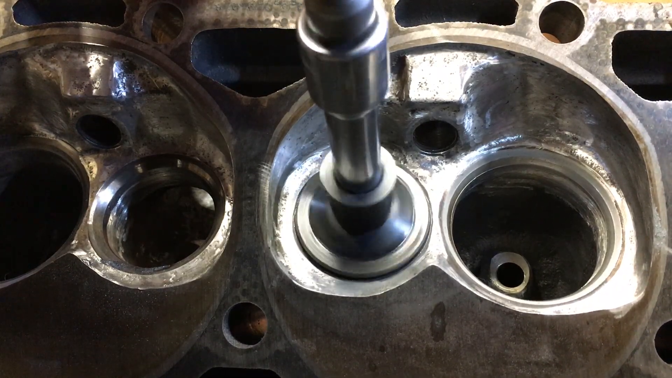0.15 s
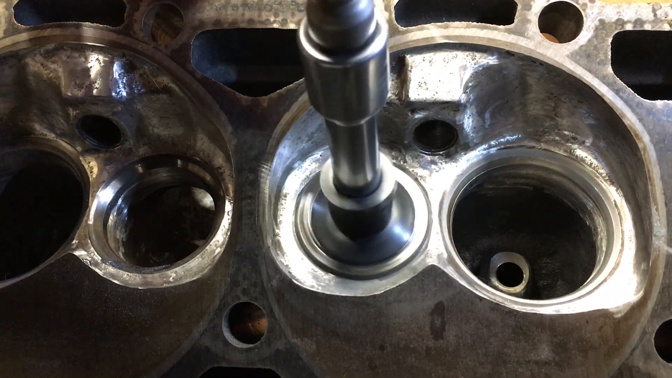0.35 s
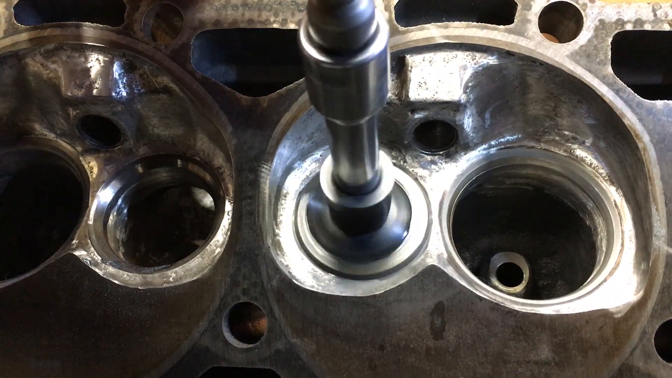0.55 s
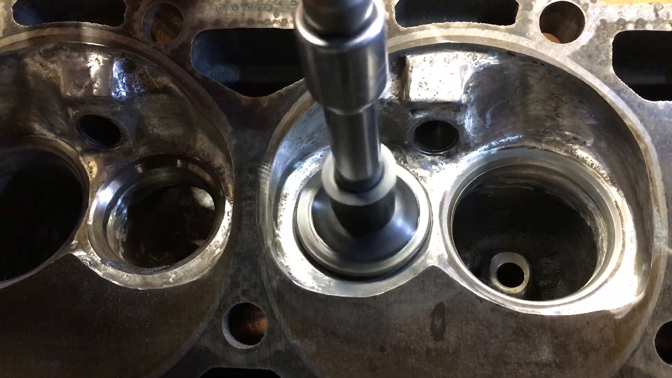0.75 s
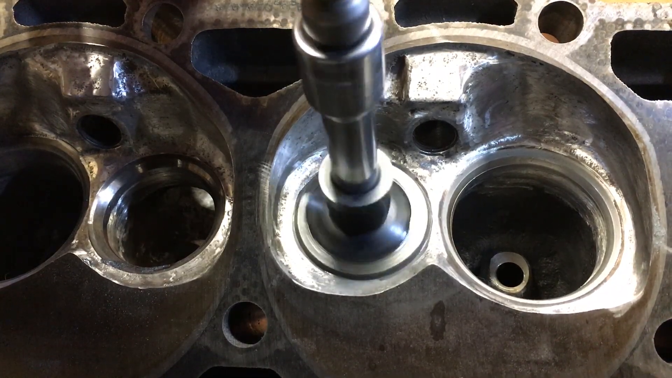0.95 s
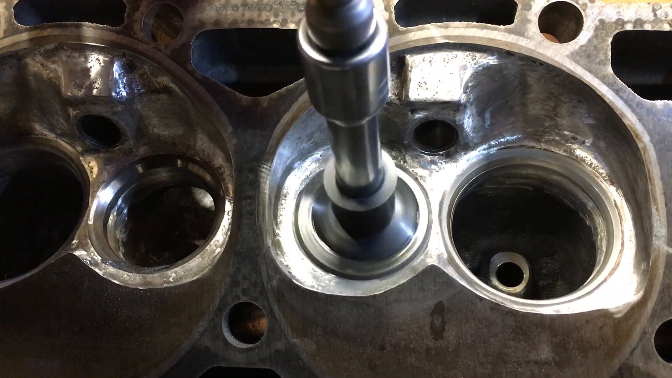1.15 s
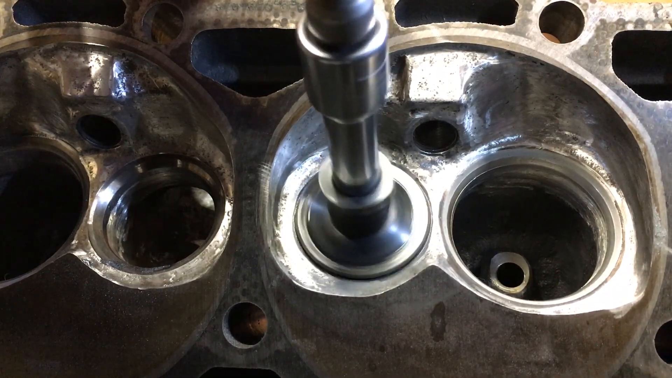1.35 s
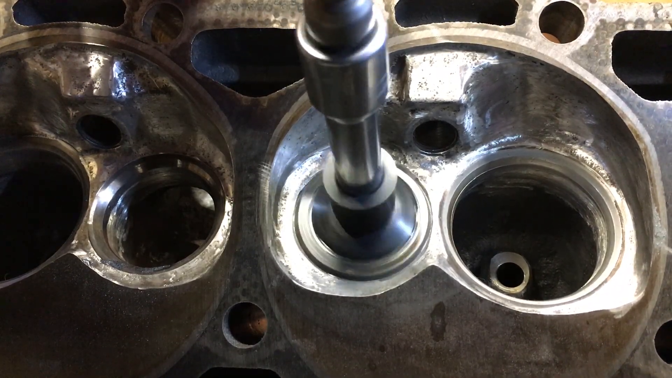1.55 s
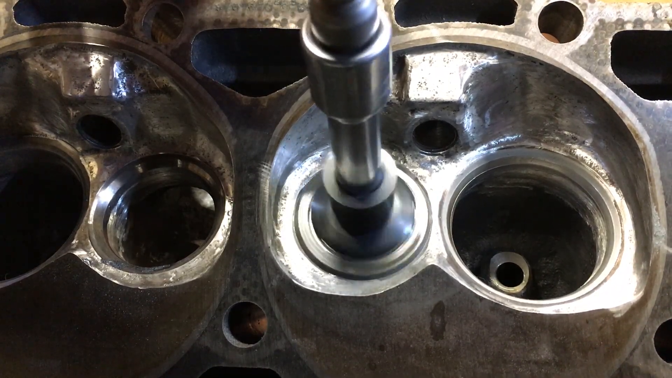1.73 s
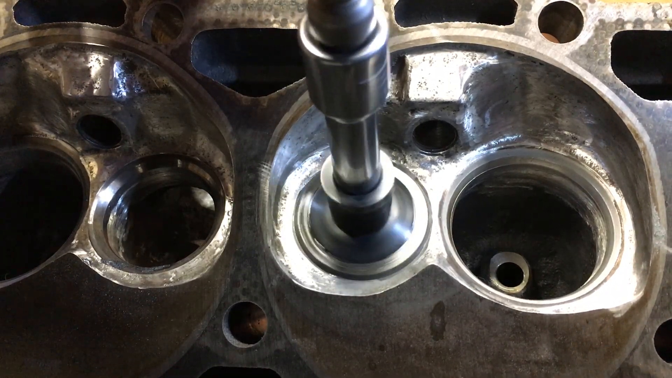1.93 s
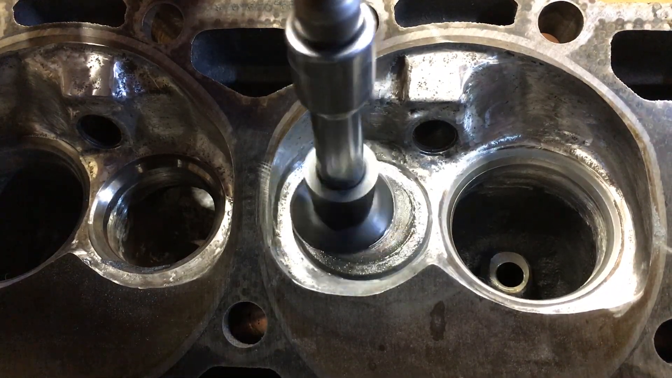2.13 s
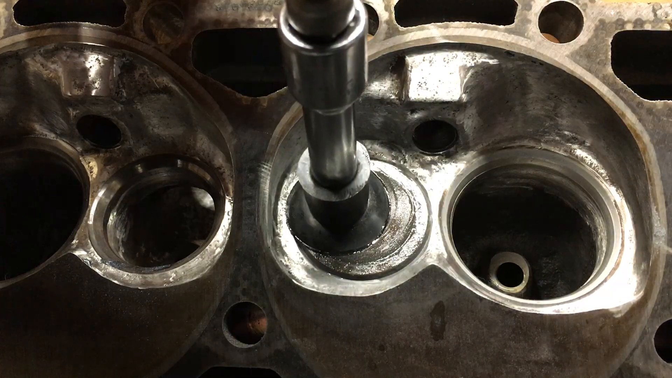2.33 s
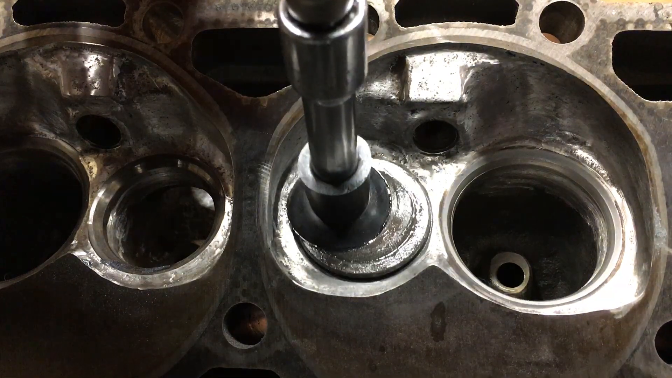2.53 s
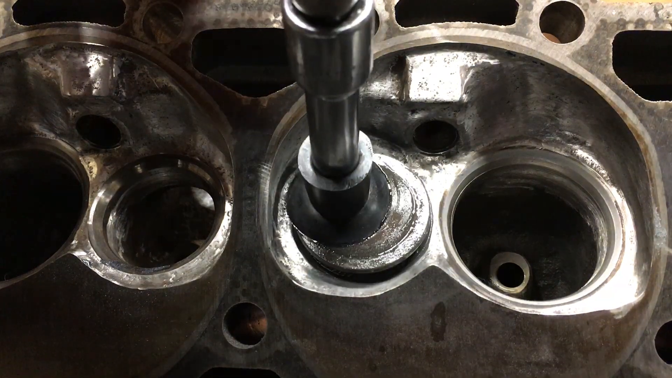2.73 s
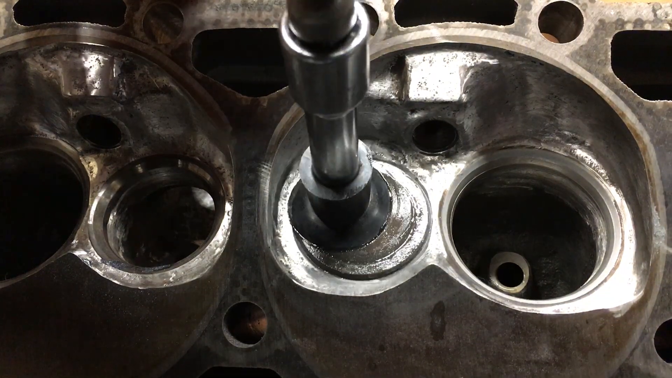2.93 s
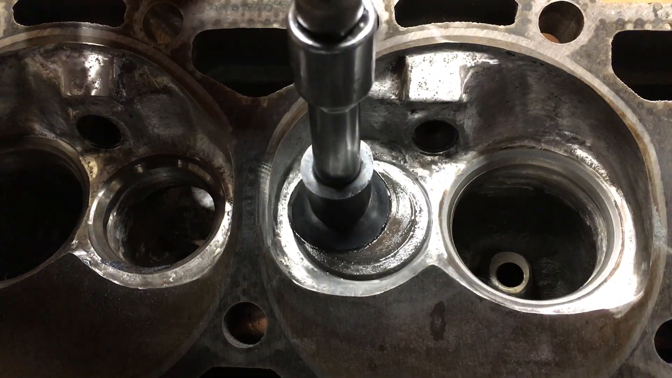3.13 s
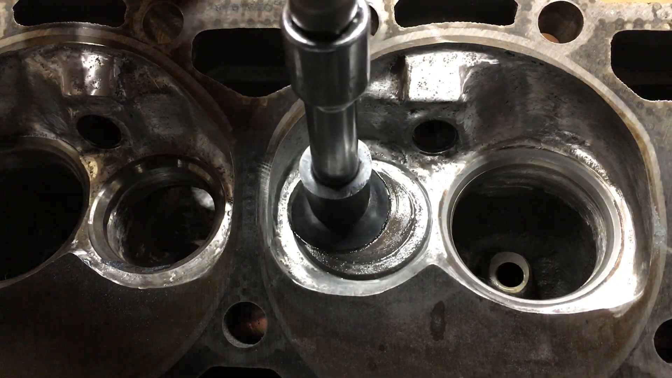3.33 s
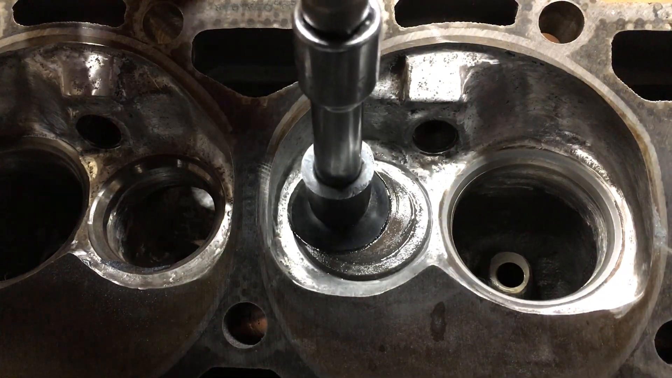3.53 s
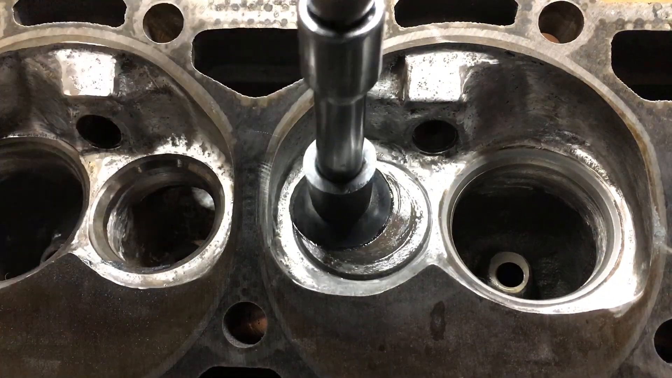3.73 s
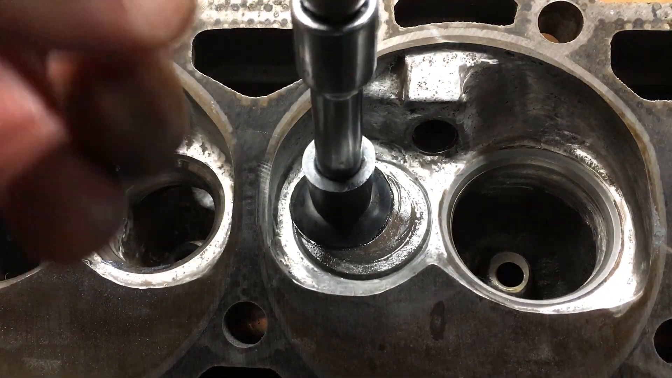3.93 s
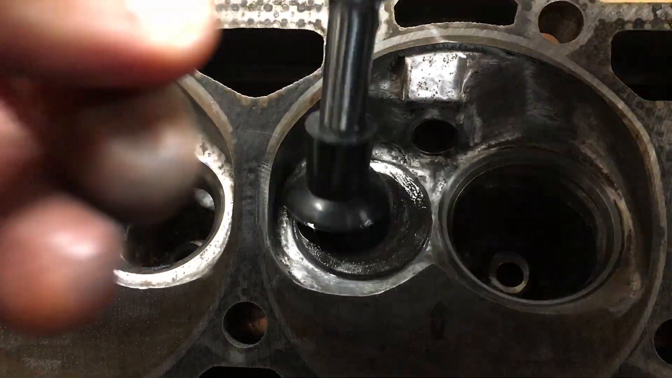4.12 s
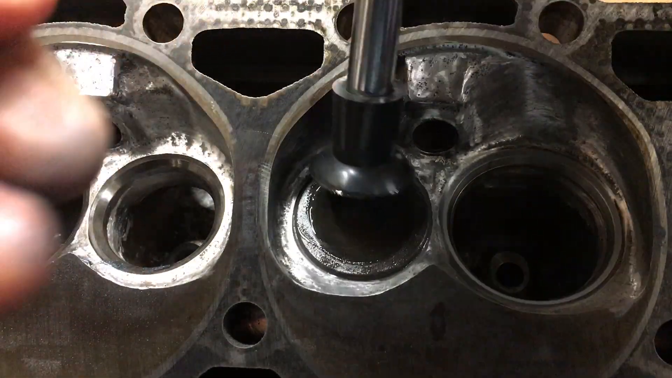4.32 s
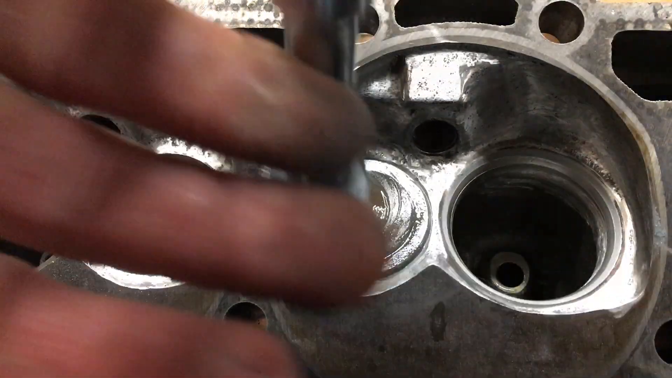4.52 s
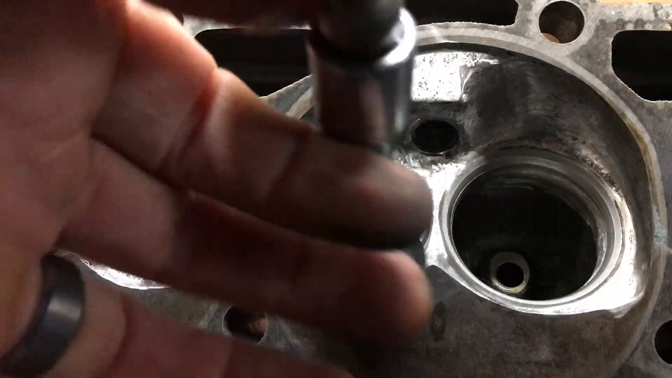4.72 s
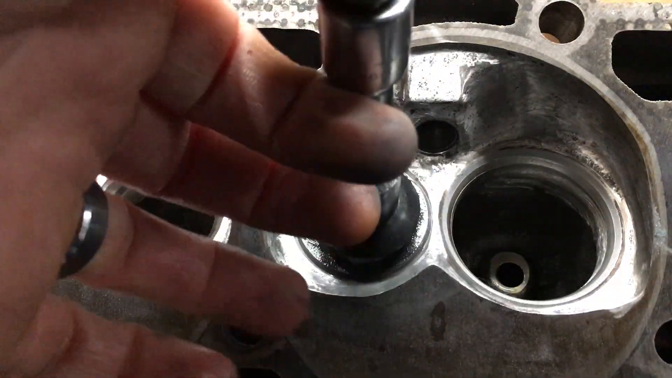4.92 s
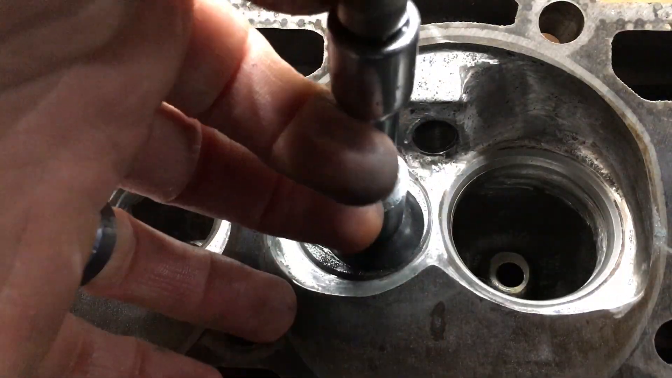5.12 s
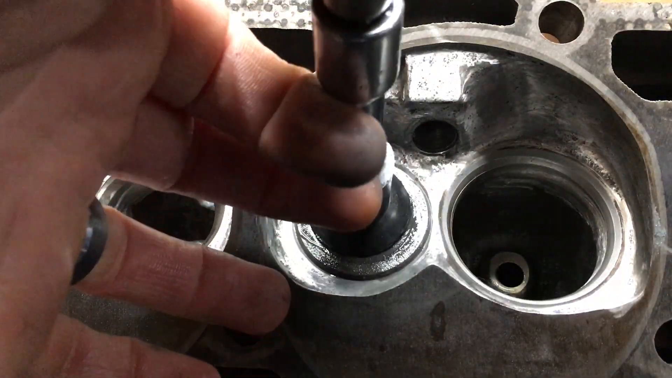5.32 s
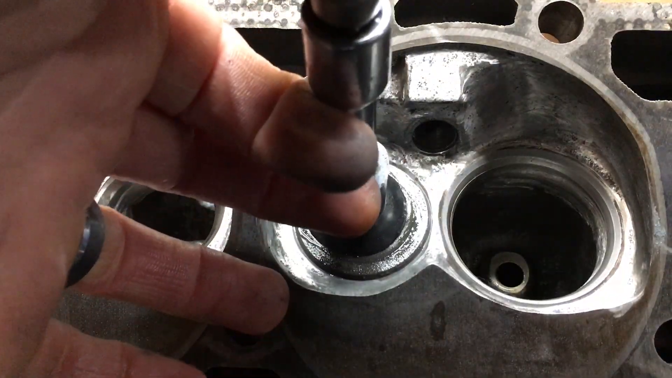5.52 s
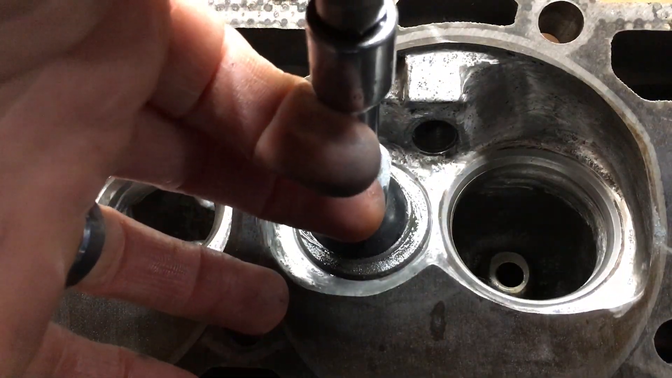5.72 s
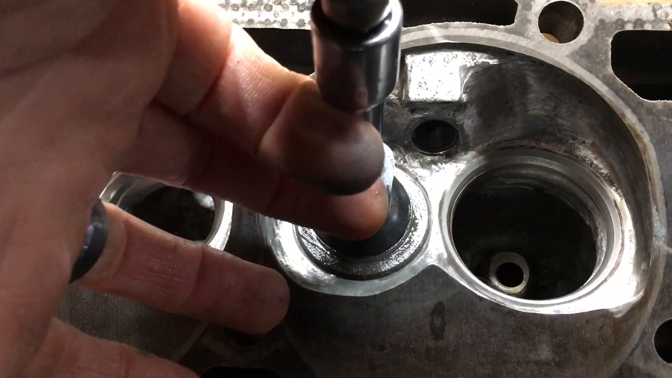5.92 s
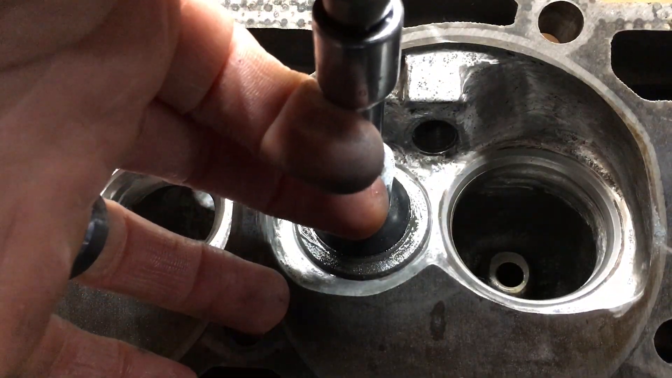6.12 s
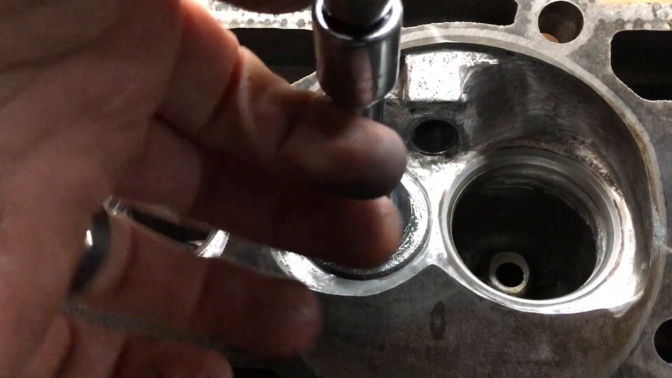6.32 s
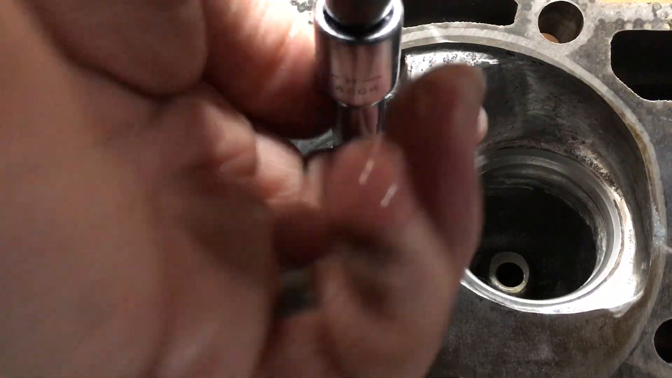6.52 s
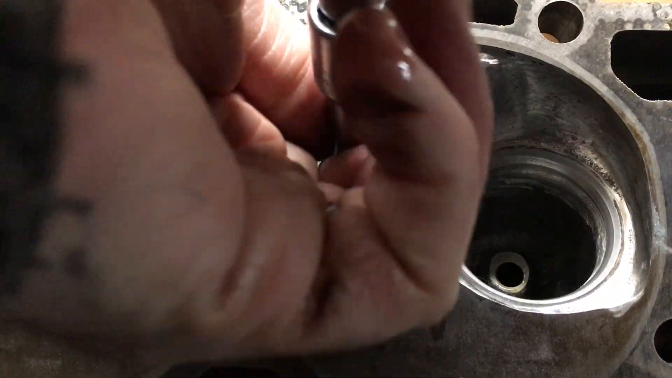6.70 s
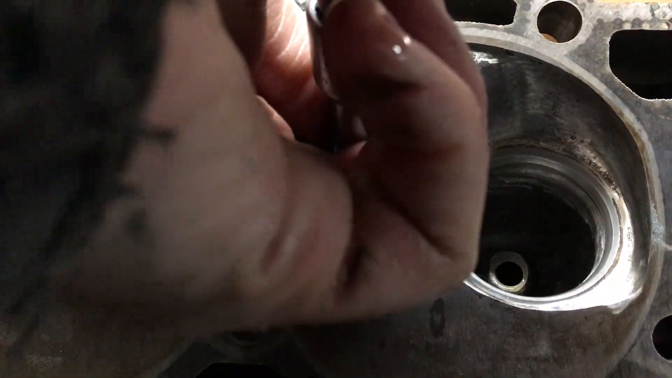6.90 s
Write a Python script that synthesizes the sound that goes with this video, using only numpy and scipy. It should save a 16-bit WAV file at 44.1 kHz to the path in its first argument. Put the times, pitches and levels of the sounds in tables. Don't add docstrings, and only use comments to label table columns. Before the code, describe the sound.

From 0 to about 2.2 seconds a small geared tool runs close to the microphone, its loose teeth rattling and its mid-pitched whine wavering and throbbing with each turn. Abrasive paste hisses brightly and crunches, surging with pushes at the start, 0.35, 1.0 and 1.65 seconds, while a thin, very high squeal dips at each bite. The motor stops abruptly near 2.25. In the quiet garage, light metal knocks and a faint ringing tap follow, with gritty scrapes around 2.9 to 3.3. A hard, sharp clack strikes at 3.4; more scraping and dull bench thumps come at 3.7 to 4.1, then knocks at 4.17 and 4.43. From 4.6 to 6 only faint fingertip rubbing, small squeaks and soft rustle remain. A click at 6.37 and rustling hands lead to a tiny tick and squeak near 6.9.

```python
import sys
import numpy as np
from scipy import signal
from scipy.fft import rfft, irfft, next_fast_len
from scipy.io import wavfile

SR = 44100
rng = np.random.default_rng(int(sys.argv[2]) if len(sys.argv) > 2 else 0)


def bounce(signal):
    frames = np.transpose(np.atleast_2d(signal))
    limited = np.clip(frames, -1, 1)
    pcm = np.round(limited * 32767).astype(np.int16)
    wavfile.write(sys.argv[1], SR, pcm)


def volts_from_decibels(level):
    exponent = np.asarray(level, float) / 20
    return 10 ** exponent


N = 311346
TIME = np.arange(N) / SR


def evened(x):
    return x / np.sqrt(np.mean(x ** 2) + 1e-20)


def read(points, hz):
    f, value = np.transpose(points)
    return np.interp(np.log(hz + 1), np.log(f + 1), value)


def follow(rows, silent=-140):
    s, db = np.transpose(rows)
    return np.interp(TIME, s, db, silent, silent)


def swaying(rows):
    s, value = np.transpose(rows)
    index = np.arange(len(s))
    place = np.interp(TIME, s, index)
    eased = place // 1 + 0.5 - 0.5 * np.cos(np.pi * (place % 1))
    return np.interp(eased, index, value)


def hump(s, length):
    return np.exp(-((TIME - s) / length) ** 2)


def stopping(s, db_per_s):
    return -db_per_s * np.maximum(TIME - s, 0)


def colour(x, points):
    size = next_fast_len(len(x))
    gain = volts_from_decibels(read(points, np.fft.rfftfreq(size, 1 / SR)))
    return evened(irfft(rfft(x, size) * gain, size)[:len(x)])


def resonate(x, hz, width):
    turn = np.exp(2j * np.pi * np.cumsum(hz * np.ones(len(x))) / SR)
    r = np.exp(-np.pi * width / SR)
    return 2 * (turn * signal.lfilter([1 - r], [1, -r], x / turn)).real


def ring(x, modes):
    out = np.zeros(len(x))
    for hz, width, db in modes:
        out += volts_from_decibels(db) * signal.lfilter(*signal.iirpeak(hz, hz / width, SR), x)
    return out


def restless(x, modes, swell_db, per_s):
    out = np.zeros(len(x))
    for mode in modes:
        swell = volts_from_decibels(swell_db * rng.standard_normal(400))
        out += ring(x, [mode]) * np.interp(TIME * per_s, np.arange(400), swell)
    return out


def lowpass(order, hz):
    return signal.butter(order, hz, fs=SR, output="sos")


def flicker(hz):
    return evened(signal.sosfilt(lowpass(2, hz), rng.standard_normal(N)))


def grit(per_s, spread_db):
    size_db = spread_db * np.minimum(rng.exponential(1, N), 3)
    size = volts_from_decibels(size_db) * rng.uniform(-1.05, 1, N)
    return evened(size * (rng.random(N) < per_s / SR))


# pitch_hz, level_db (per Hz)
RATTLE_SPECTRUM = [(24, -61.5), (40, -31), (112, -20), (470, -17), (620, -8), (904, -6), (1250, -1),
                   (2290, 0), (3700, -3), (4750, -14.5), (6430, -15.5), (6930, -11), (7670, -24.5),
                   (12400, -39.5), (16300, -49)]


def gear_rattle(low_db, high_db):
    low = colour(grit(9000, 2.7), RATTLE_SPECTRUM)
    high = colour(grit(9000, 2.7), RATTLE_SPECTRUM)
    split = lowpass(2, 2600)
    treble = high - signal.sosfiltfilt(split, high)
    return signal.sosfiltfilt(split, low) * volts_from_decibels(low_db) + treble * volts_from_decibels(high_db)


# pitch_hz, width_hz, level_db
CASING_MODES = [(1760, 150, -5), (1155, 180, -15), (565, 83, -20)]
# multiple, width_hz, level_db (re rattle), once_per_turn_db, twice_per_turn_db, twice_lag_rad
MESH_HARMONICS = [(1, 100, -16.5, 5, 1.0, 0.67), (2, 29, -9, -3.5, 6.0, 1), (3, 90, -10.5, 0, 3.5, -.5),
                  (4, 79, -15.5, -2.5, -1.6, .1), (6, 73, -14.5, 2, 6, .15), (7, 85, -16, 1.4, 5.5, .8)]


def gear_whine(mesh_hz, angle, once, low_db):
    noise = rng.standard_normal(N)
    whine = ring(noise * volts_from_decibels(0.87 * low_db), CASING_MODES) * volts_from_decibels(17)
    mesh_hz = mesh_hz + 9 * np.sin(angle + 0.45)
    for k, width, db, once_db, twice_db, lag in MESH_HARMONICS:
        fuzz = evened(resonate(resonate(noise, k * mesh_hz, width), k * mesh_hz, width))
        tone = np.sin(2 * np.pi * k * np.cumsum(mesh_hz + 8 * flicker(45)) / SR)
        throb_db = once_db * once + twice_db * np.cos(2 * angle - lag)
        whine += volts_from_decibels(db + throb_db) * (0.36 * fuzz + 1.1 * tone)
    return whine * volts_from_decibels(stopping(2.15, 39))


# pitch_hz, level_db (per Hz)
PASTE_SPECTRUM = [(1470, -33.5), (2500, -23.5), (3190, -6.5), (3500, 2), (4950, -4), (5480, -2), (6770, -8),
                  (7320, -2), (7740, -3), (9190, -1.5), (12600, -7), (15400, -12), (16300, -17)]
# pitch_hz, width_hz, level_db
HEAD_MODES = [(2920, 150, -6.5), (3390, 20, -6.5), (3540, 49, -2), (3800, 58, -3), (3840, 59, -6),
              (4130, 61, 2.4), (4400, 88, -7.5), (5260, 120, -9.5), (5640, 440, -4), (6440, 96, -6.5),
              (6660, 64, -5.5), (7290, 31, -2), (8300, 180, -11.5), (8860, 46, 0.5), (9350, 160, -5.5),
              (9500, 24, -14.5), (11370, 75, -5.5), (12500, 91, -8)]


def paste_hiss(angle, loose, high_db):
    paste = grit(15000, 0.95)
    waver_db = 2.2 * flicker(45) + 0.36 * np.cos(2 * angle + 0.7)
    hiss = colour(paste, PASTE_SPECTRUM) * volts_from_decibels(3 + loose * waver_db)
    drive_db = loose * (0.7 * high_db + 0.77 * np.cos(2 * angle + 0.3))
    head = evened(restless(paste * volts_from_decibels(drive_db), HEAD_MODES, 2.2, 16)) * volts_from_decibels(4)
    return hiss + head


# time_s, length_s, drop_hz, gain_db
SEAT_BITES = [
    (0.184, .05, 51.6, 4),
    (0.516, 0.09, 51, 3.5),
    (0.706, .14, 25, -0.5),
    (1.25, 0.16, 87.65, 2),
    (1.788, .06, 59.3, 4.5),
    (2.02, 0.25, 31.2, -2),
]


def seat_squeal():
    hz, db = 7175, -31
    for s, length, drop_hz, gain_db in SEAT_BITES:
        hz = hz - drop_hz * hump(s, length)
        db = db + gain_db * hump(s, length)
    db = db - 7 * hump(0, 0.058) + stopping(2.22, 554)
    tone = np.sqrt(2) * np.sin(2 * np.pi * np.cumsum(hz + 5 * flicker(36)) / SR)
    return tone * volts_from_decibels(db + 1.9 * flicker(92))


def crunches(rows, share, swell_s, trim_db):
    out, t = np.zeros(N), np.arange(2000) / SR
    envelope = (t / swell_s) * np.exp(1 - t / swell_s)
    for s, db, hz in rows:
        puff = rng.standard_normal(len(t))
        body = evened(ring(puff, [(hz, share * hz, 0), (1.45 * hz, 0.35 * hz, -12)]))
        out[round(s * SR):][:len(t)] += volts_from_decibels(db + trim_db) * body * envelope
    return out


# start_s, end_s, gain_db (of paste hiss)
HAND_PUSHES = [
    (-.35, 0, 8),
    (0.334, 0.67, 8),
    (0.996, 1.304, 7.5),
    (1.625, 2.184, 8),
]


def hand_pressure():
    push_db = np.zeros(N)
    for start, end, db in HAND_PUSHES:
        press = np.minimum((TIME - start) / 0.1, 1 - (TIME - end) / 0.12)
        push_db += (db - 3.5 * (TIME - start)) * np.clip(press, 0, 1)
    return push_db


# time_s, pitch_hz
MESH_SPEED = [(0, 583), (.29, 634), (.6, 586), (.97, 635.2), (1.29, 574), (1.6, 633.2), (1.89, 572.3),
              (2.1, 582), (2.3, 568)]
# time_s, peak_db, pitch_hz
PASTE_CRUNCHES = [(0.0513, -13, 4200), (0.175, -13.5, 3750), (0.1945, -13, 3770), (0.2159, -12, 3600),
                  (0.2593, -15, 3800), (0.2907, -13, 3780), (0.3301, -14.5, 3750), (0.3795, -8.5, 3810),
                  (0.4564, -11, 4200), (0.4868, -9.5, 3770), (0.5082, -10.5, 4150), (0.5362, -12, 3550),
                  (0.622, -11, 3520), (0.7986, -14.5, 3790), (0.836, -18, 3880), (0.8714, -14.5, 3770),
                  (0.9123, -16, 5480), (0.9512, -12.5, 4130), (0.9882, -13, 3770), (1.036, -8.5, 3940),
                  (1.077, -12.5, 3800), (1.1084, -12.5, 3460), (1.1348, -10.5, 4240), (1.1962, -8.5, 3550),
                  (1.276, -14.5, 3750), (1.3718, -13, 4090), (1.4037, -15.5, 3050), (1.4491, -11, 3710),
                  (1.5219, -14.5, 3740), (1.6412, -13.5, 3940), (1.6891, -6, 4210), (1.7389, -7, 4170),
                  (1.7679, -7.5, 4130), (1.8592, -11, 3580), (1.943, -10.5, 3380), (1.9764, -13, 3770),
                  (2.0248, -7, 4040), (2.1106, -10, 3970), (2.2009, -10.5, 2930)]
# time_s, peak_db, pitch_hz
DRIVE_CLUNKS = [(0.017, -28.5, 950), (0.538, -25, 796), (0.593, -30.5, 1000), (0.649, -31, 865),
                (0.717, -24.5, 875), (1.055, -18.5, 842), (1.113, -18, 997), (1.283, -25, 813),
                (1.35, -28.5, 999), (1.446, -28.5, 797), (1.625, -26, 750), (1.686, -25.5, 743),
                (1.769, -27, 925), (1.854, -28.5, 862)]


def grinder():
    stop_s, teeth, first_turn = 2.275, 49.8, 0.3
    push_db = hand_pressure()
    rattle_db = -24 - 0.1 * push_db + stopping(stop_s, 554)
    paste_db = -36.5 + push_db + stopping(stop_s - 0.0054, 625)
    loose = np.clip(1.5 - push_db / 9.5, 0.15, 1)
    mesh_hz = swaying(MESH_SPEED)
    angle = 2 * np.pi * (np.cumsum(mesh_hz) / SR / teeth + first_turn)
    once = np.cos(angle - 0.2)
    low_db = 0.8 * np.cos(2 * angle + 0.36) + 1.4 * once + 2.1 * flicker(75)
    high_db = 1.1 * np.cos(2 * angle + 0.05) + 0.72 * once + 1.7 * flicker(70)
    gears = volts_from_decibels(-0.11) * gear_rattle(low_db, high_db) + gear_whine(mesh_hz, angle, once, low_db)
    seat = volts_from_decibels(paste_db) * paste_hiss(angle, loose, high_db) + seat_squeal()
    cracks = crunches(PASTE_CRUNCHES, 0.22, 0.004, -10.5)
    clunks = crunches(DRIVE_CLUNKS, 0.25, 0.0034, -6.5)
    return volts_from_decibels(rattle_db) * gears + seat + cracks + clunks


# pitch_hz, t60_s
GARAGE_DECAY = [(300, 0.5), (600, 0.28), (1500, 0.35), (4000, 0.6), (12000, 0.28)]


def garage_echo(x):
    taps = rng.standard_normal(SR // 2) * (np.arange(SR // 2) > 250)
    hz, t, z = signal.stft(taps, SR, nperseg=256)
    decay = volts_from_decibels(-60 * t / read(GARAGE_DECAY, hz)[:, None])
    tail = signal.istft(z * decay, SR, nperseg=256)[1]
    return signal.fftconvolve(x, tail / np.linalg.norm(tail))[:N]


# pitch_hz, level_db (per Hz)
AIR_SPECTRUM = [(120, -36), (200, -11.5), (245, -4), (264, -6.5), (300, 0), (361, -8.5), (467, -20),
                (1110, -16.5), (4930, -29.5), (12600, -36), (16300, -35.5)]


def room_air():
    return volts_from_decibels(-73) * colour(rng.standard_normal(N), AIR_SPECTRUM)


# time_s, length_s, rumble_db, knuckle_db (re rumble)
GRIP_SHIFTS = [(2.321, 0.068, -71, 10), (2.62, 0.15, -61.5, -8), (3.145, 0.21, -59.5, -4),
               (3.82, 0.088, -45, -8.5), (4.018, 0.074, -60, -3), (4.13, 0.22, -53, -7.5),
               (4.6, 0.19, -71, 2.5), (5.21, 0.29, -68, -16), (5.947, 0.13, -70, -16),
               (6.4, 0.12, -66, -30), (6.853, 0.4, -73.5, 2.5)]


def shaking():
    motor_db = stopping(2.195, 138.5)
    rumble = volts_from_decibels(-54.5 + motor_db) + volts_from_decibels(-67.5)
    knuckle = volts_from_decibels(-56.5 + motor_db) + volts_from_decibels(-73.5)
    for s, length, db, knuckle_db in GRIP_SHIFTS:
        rumble += volts_from_decibels(db) * hump(s, length)
        knuckle += volts_from_decibels(db + knuckle_db) * hump(s, length)
    return rumble, knuckle


# pitch_hz, level_db (per Hz)
RUMBLE_SPECTRUM = [(12, -44), (20, -16), (35, -6.5), (64, 3), (81, -3), (102, -4.5), (127, -2), (151, -19),
                   (200, -18.5), (260, -41.5), (440, -120)]
# pitch_hz, level_db (per Hz)
KNUCKLE_SPECTRUM = [(60, -32), (140, -3), (300, 0.5), (500, -10), (900, -16), (2500, -38)]
# pitch_hz, level_db (per Hz)
RUSTLE_SPECTRUM = [(290, -36.5), (500, -3), (578, 5.5), (833, -8.5), (936, 2), (4720, -8.5), (8970, -11),
                   (15200, -16), (16300, -17)]
# time_s, level_db
RUSTLE_LEVEL = [(2.33, -61.5), (2.76, -65), (2.8, -85), (3.05, -65.5), (3.45, -69), (3.8, -57),
                (4.1, -66.5), (4.25, -63), (4.6, -60), (4.8, -67.5), (5.08, -71), (5.85, -75.5), (6.3, -83),
                (6.39, -66.5), (6.56, -60), (6.73, -61), (6.79, -65.5), (7.06, -65.5)]
# pitch_hz, width_hz, level_db
VALVE_MODES = [(1085, 40, 0.5), (1280, 50, -4.5), (3500, 60, -4.5), (4200, 60, -5), (6280, 160, -11.5),
               (7150, 150, -13.5), (8690, 150, -11.5), (11400, 200, -12)]
# time_s, level_db
FINGERTIP_LEVEL = [
    (4.62, -95),
    (4.72, -71),
    (5.1, -86),
    (5.3, -73),
    (5.9, -83),
    (6.05, -93),
]


def hands():
    low, high = shaking()
    rumble = colour(rng.standard_normal(N), RUMBLE_SPECTRUM) * low * volts_from_decibels(1.5 * flicker(7.5))
    knuckle = colour(rng.standard_normal(N), KNUCKLE_SPECTRUM) * high * volts_from_decibels(0.5 * flicker(8.3))
    hum = evened(restless(rng.standard_normal(N), VALVE_MODES, 3.5, 11))
    hum *= volts_from_decibels(follow(FINGERTIP_LEVEL) + 1.106 * flicker(8))
    rustle = colour(grit(8700, 0.92), RUSTLE_SPECTRUM) * volts_from_decibels(follow(RUSTLE_LEVEL) + 0.95 * flicker(30))
    return rumble + knuckle + hum + rustle


# time_s, peak_db, body_hz, thud_db, tick_db
TOOL_KNOCKS = [(2.502, -35.5, 1650, -8, -23), (2.541, -48.5, 1690, 15.5, 7), (2.642, -52, 2000, 8, -11),
               (2.67, -56, 1900, -3, -11), (2.965, -34, 1400, 2, -14), (2.967, -26, 885, 0, -16),
               (2.953, -44, 1500, -8, -10), (2.997, -35.5, 1960, 5.5, 4), (3.072, -46.5, 900, -8, -15),
               (3.101, -50, 1490, 4, -14), (3.3946, -10, 2260, -22, -2), (3.3965, -21, 3800, -14, 0),
               (3.3976, -15.5, 980, -9, -4), (3.3951, -21, 365, -24, -20), (3.987, -44.5, 520, 3, -23),
               (4.003, -38.5, 4400, 7, -5), (4.012, -44, 2400, -6, -5), (4.1644, -39, 7200, -16, 1.5),
               (4.1652, -21, 5800, -18, 1), (4.166, -18.5, 2200, -7, -8), (4.1662, -18.5, 420, 2, -20),
               (4.4255, -29.5, 2050, -21, 1.5), (4.4257, -34, 5350, -20, -9), (4.405, -52, 900, 3, -17),
               (4.66, -53, 1190, -11, -18), (5.521, -50, 1221, -1, -6), (6.322, -42, 1060, 2, -36.5),
               (6.371, -26.5, 2800, -3, 0), (6.914, -44, 3290, -17, -1)]


def knocks():
    out, t = np.zeros(N + 6000), np.arange(6000) / SR
    for s, db, hz, thud_db, tick_db in TOOL_KNOCKS:
        t60 = 0.026 * volts_from_decibels(-0.0518 * (db + 33))
        crack = 0.11 * rng.standard_normal(len(t)) * volts_from_decibels(-60 * t / t60) * np.minimum(t / 0.000086, 1)
        crack[30] -= 1
        soft = signal.sosfilt(lowpass(3, min(3.04 * hz, SR / 2.2)), crack)
        body = ring(soft, [(hz, 0.3 * hz, 0), (1.35 * hz, 0.4 * hz, -5)])
        thud = ring(soft, [(408, 80, -30), (780, 1800, 17)])
        tick = ring(crack * volts_from_decibels(-60 * t / 0.11), [(5700, 1000, -8.5), (9200, 2000, 24), (14300, 5000, 0)])
        for part, part_db in ((body, 0), (thud, thud_db), (tick, tick_db)):
            out[round(s * SR):][:len(t)] += volts_from_decibels(db + part_db) * part / abs(part).max()
    return out[:N]


# peak_s, level_db, rise_s, fall_s, deep_ring_db
BAR_STROKES = [(2.668, -61, 0.057, 0.1, -22), (2.945, -55.5, 0.087, .04, -4),
               (3.114, -48, 0.012, 0.021, -18), (3.209, -59.5, 0.047, 0.03, -10),
               (3.238, -54, 0.055, 0.048, -14.5), (3.272, -50, 0.057, 0.047, -10),
               (3.704, -58.5, 0.032, .06, -22), (3.73, -57, 0.025, 0.03, -22),
               (3.754, -52, 0.03, 0.027, -21), (3.786, -52.5, 0.022, 0.043, 5),
               (3.82, -59, 0.017, 0.04, -3), (3.84, -55, .03, 0.033, -15), (3.864, -53.5, .04, 0.053, -11)]


def strokes():
    out = np.zeros((4, N))
    for s, db, rise, fall, deep_db in BAR_STROKES:
        drop_db = 34 * np.maximum((s - TIME) / rise, (TIME - s) / fall) ** 1.7
        ring_db = db - drop_db * np.where(TIME > s, 1 - 0.28, 1)
        out += volts_from_decibels(np.array([db - drop_db, ring_db + deep_db, ring_db - 7, ring_db - 0.5]))
    return out


# pitch_hz, level_db (per Hz)
SLIDE_SPECTRUM = [(290, -41), (500, -5), (809, -15), (1050, -3), (1800, -14), (2120, -7), (3580, -12.5),
                  (9230, -7), (14100, -13.5), (16300, -28)]
# pitch_hz, width_hz, level_db
BAR_MODES = [(1024, 7.1, 9), (1400, 15, -7), (2173, 26, 3.5), (3230, 42, 1), (3800, 13, 5), (4270, 29, -6),
             (5360, 36, -1), (5500, 30, -1), (5740, 24, 0.5), (6170, 38, -4), (6450, 22, 7.5),
             (7200, 65, -0.5), (7850, 54, -20), (8270, 31, -6), (8960, 53, -2), (9240, 21, -20),
             (10200, 45, -30), (11400, 33, -1)]


def slides():
    level, *rings = strokes()
    drag = grit(7000, 0.85) * volts_from_decibels(1.1 * flicker(85))
    out = colour(drag, SLIDE_SPECTRUM) * level
    for modes, gain in zip((BAR_MODES[:2], BAR_MODES[2:3], BAR_MODES[3:]), rings):
        damped = [(hz, 1.7 * width, db) for hz, width, db in modes]
        out += restless(drag * gain, damped, 1.4, 11) / np.std(ring(drag, damped))
    return out


# pitch_hz, level_db, t60_s
TAPPED_MODES = [(1040, -1.5, 0.58), (1400, -7, 0.22), (2170, -15, 0.14), (2540, -24, 0.41),
                (3300, -19, 0.2), (3800, -14, 0.1), (4040, -13, 0.17), (5260, -26, 0.11), (5760, -21, 0.31),
                (6309, -20, 0.15), (6870, -19, 0.054), (7000, -8, 0.12), (8800, -4, 0.076)]
# time_s, ring_db, free_s (until a hand damps it)
BAR_TAPS = [
    (2.642, -57, 0.21),
    (3.113, -44.5, 0.084),
    (3.27, -55, 0.12),
    (3.817, -50, 0.023),
]


def taps():
    out, t = np.zeros(N), np.arange(15000) / SR
    for s, db, free in BAR_TAPS:
        tone = np.zeros(len(t))
        for hz, mode_db, t60 in TAPPED_MODES:
            reach_db = 1.1 * rng.standard_normal()
            tone += volts_from_decibels(mode_db + reach_db - 60 * t / t60) * np.sin(2 * np.pi * hz * t)
        out[round(s * SR):][:len(t)] += volts_from_decibels(db - 499 * np.maximum(t - free, 0)) * tone
    return out


# time_s, peak_db, deep_db, t60_s
BENCH_BUMPS = [(2.919, -41.5, 3.5, 0.26), (2.968, -32.5, -21, 0.16), (3.393, -40.5, 1, 0.067),
               (3.749, -35.5, -3, 0.14), (3.862, -33, -4.5, 0.12), (3.987, -33, -1, 0.15),
               (4.045, -40.5, 2, 0.11), (4.108, -60, -2, 0.15), (4.165, -24, -24, 0.066),
               (4.406, -48.5, -9, 0.21), (6.32, -46, -7, 0.2), (6.368, -41, -6, 0.064)]


def bumps():
    out, t = np.zeros(N + 15000), np.arange(15000) / SR
    for s, db, deep_db, t60 in BENCH_BUMPS:
        thump = colour(rng.standard_normal(len(t)), KNUCKLE_SPECTRUM)
        thump *= volts_from_decibels(-60 * t / t60) * np.minimum(t / 0.0032, 1)
        deep = colour(rng.standard_normal(len(t)), RUMBLE_SPECTRUM)
        deep *= volts_from_decibels(-60 * t / (4.4 * t60)) * np.minimum(t / 0.013, 1)
        bump = thump / abs(thump).max() + volts_from_decibels(deep_db) * deep / abs(deep).max()
        out[round(s * SR):][:len(t)] += volts_from_decibels(db) * bump
    return out[:N]


# time_s, peak_db, pitch_hz, length_s
FINGER_SQUEAKS = [(4.361, -49, 5640, 0.05), (4.368, -49, 9150, .033), (4.736, -63, 7020, 0.062),
                  (4.87, -56, 9670, 0.062), (4.87, -59, 6820, .055), (5.194, -64, 4200, 0.024),
                  (5.238, -59, 3370, .042), (5.324, -52, 3330, 0.037), (5.345, -48, 3400, 0.032),
                  (5.499, -55, 3380, 0.015), (5.614, -61, 3630, 0.028), (5.634, -64, 3800, 0.026),
                  (5.834, -55.5, 3470, 0.038), (5.837, -63, 10500, 0.032), (5.877, -57.5, 3500, 0.059),
                  (6.38, -57, 5500, 0.047), (6.905, -46, 10540, .032), (6.953, -52.5, 10500, 0.033)]
# time_s, peak_db, pitch_hz, length_s
SKIN_WHISTLES = [
    (5.018, -53, 4240, 0.021),
    (5.12, -61, 1290, .09),
    (5.4, -63, 1400, 0.046),
    (4.655, -60, 2300, 0.0405),
]


def squeaks():
    out = np.zeros(N)
    for rows, narrow in ((FINGER_SQUEAKS, 1), (SKIN_WHISTLES, 0.4)):
        for s, db, hz, length in rows:
            slip = rng.standard_normal(round(length * SR))
            width = narrow * (0.13 + 0.059 * hz / 1000) * hz
            mode = [(hz, width, 0)]
            rasp = evened(ring(ring(slip, mode), mode)) * np.hanning(len(slip))
            out[round(s * SR):][:len(slip)] += volts_from_decibels(db - 10.5) * rasp
    return out


def scene():
    close = grinder() + knocks() + slides() + taps() + squeaks()
    return (close + volts_from_decibels(-26) * garage_echo(close) + room_air() + hands() + bumps())[None]


def low_pass(x):
    return signal.sosfilt(signal.butter(12, 16790, fs=SR, output="sos"), x)


def record(dry):
    band_limit = signal.firwin(511, 15950, window=("kaiser", 9), fs=SR)
    limited = signal.oaconvolve(dry, band_limit[None], "same")
    return low_pass(limited)


dry = scene()
out = record(dry)
bounce(out)
```